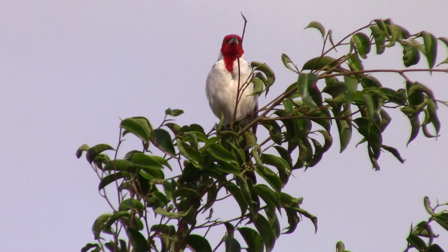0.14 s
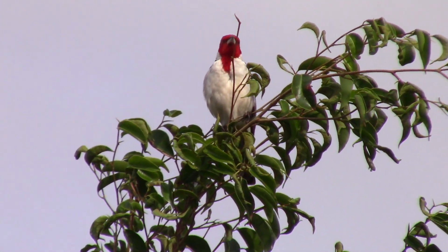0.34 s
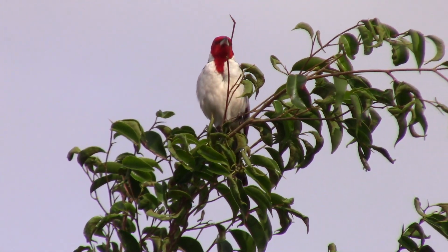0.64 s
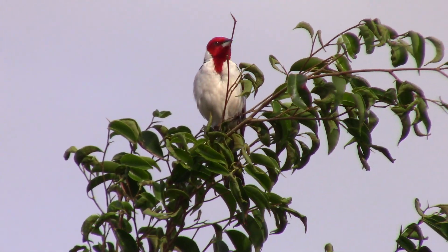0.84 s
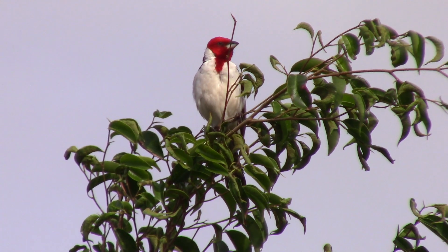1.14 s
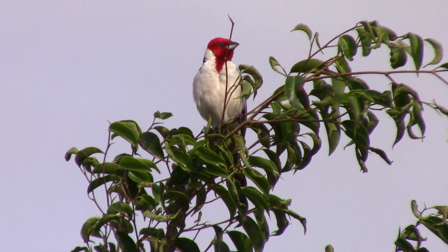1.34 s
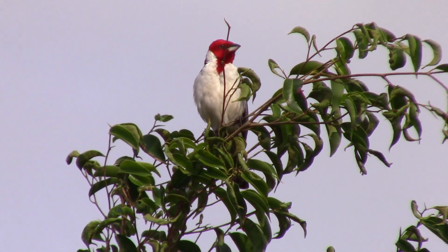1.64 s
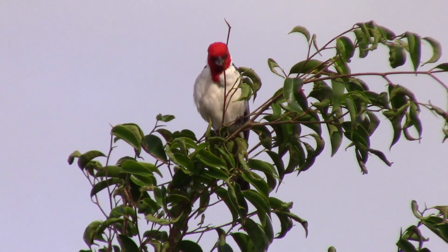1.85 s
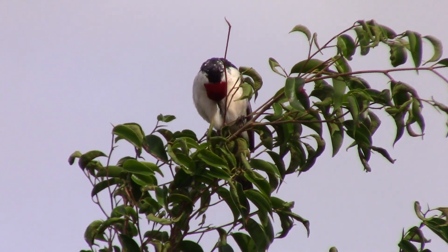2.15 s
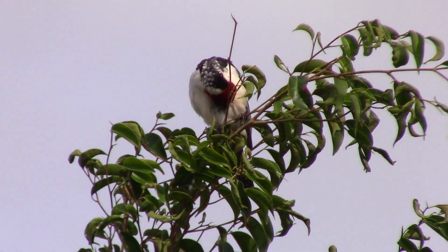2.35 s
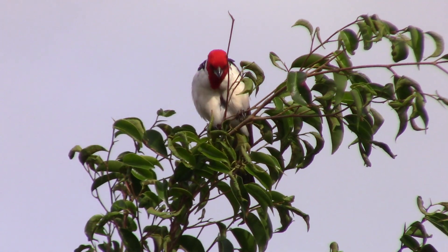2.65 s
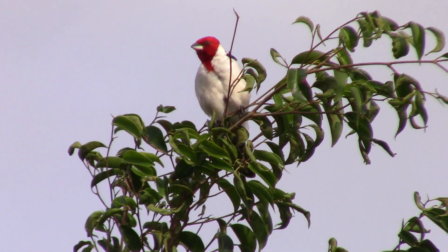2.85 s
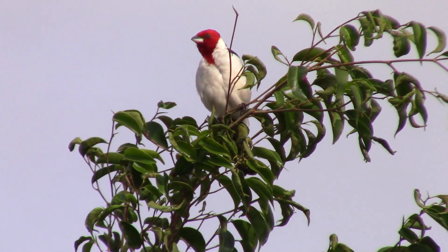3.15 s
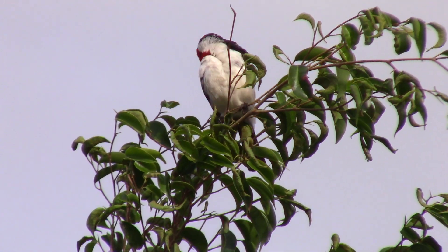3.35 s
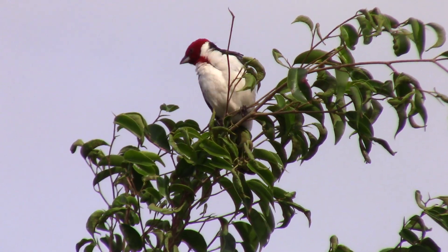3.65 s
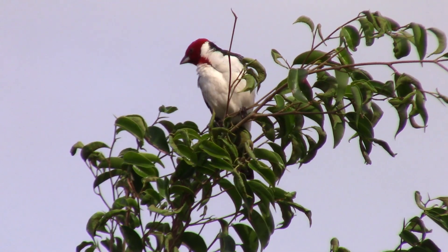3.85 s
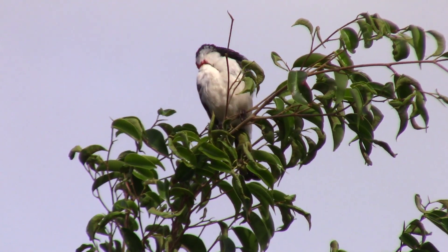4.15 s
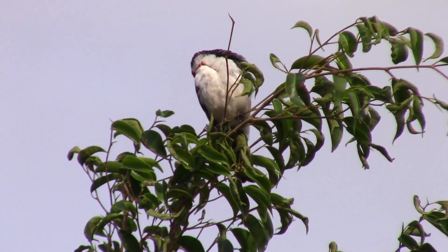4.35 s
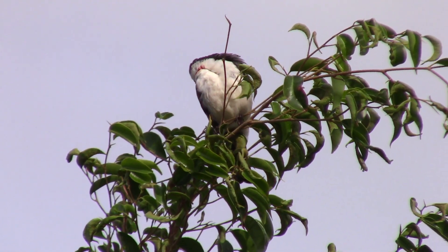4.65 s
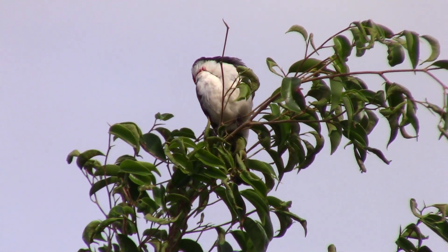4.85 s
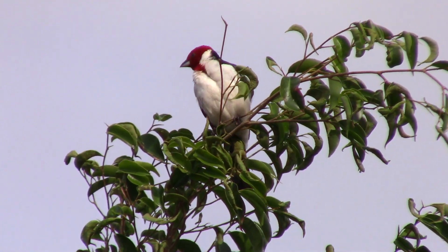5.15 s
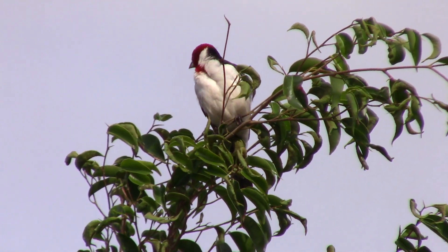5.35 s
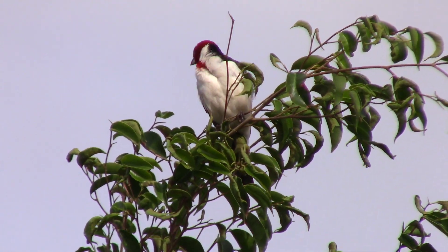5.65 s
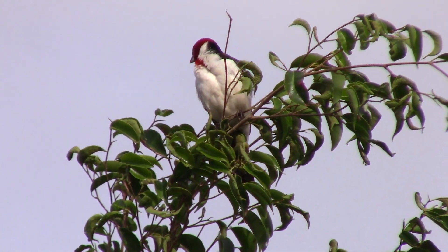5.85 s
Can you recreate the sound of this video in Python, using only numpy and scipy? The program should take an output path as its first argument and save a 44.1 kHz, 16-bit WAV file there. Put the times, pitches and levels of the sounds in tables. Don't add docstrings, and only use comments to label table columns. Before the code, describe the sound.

Outdoors, bright accelerating bird trills alternate near and far over whistled calls and flock chatter, leaf hiss, early wind buffeting and a slowly swelling road rumble.

```python
import sys
import numpy as np
from scipy import signal
from scipy.io import wavfile
from scipy.ndimage import uniform_filter1d

SR = 44100
rng = np.random.default_rng(int(sys.argv[2]) if len(sys.argv) > 2 else 0)


def to_wav(s):
    ch = np.atleast_2d(s).T
    pcm = np.round(np.clip(ch, -1, 1) * 32767)
    wavfile.write(sys.argv[1], SR, pcm.astype(np.int16))


def to_linear_factor(level_db):
    exponent = np.asarray(level_db, float) / 20
    return 10 ** exponent


N = 264820
SIDE = np.array([[.5], [-.5]])


def evened(x):
    return x / np.sqrt(np.mean(x ** 2) + 1e-20)


def add(mix, s, sound):
    part = mix[..., max(round(s * SR), 0):][..., :sound.shape[-1]]
    part += sound[..., :part.shape[-1]]


def follow(rows, smooth=.002):
    s, *columns = np.transpose(rows)
    t = np.arange(s[0], s[-1], 1 / SR)
    size = int(smooth * SR) + 1
    return [uniform_filter1d(np.interp(t, s, c), size, mode="nearest") for c in columns]


def level(rows):
    s, db = np.transpose(rows)
    return np.interp(np.arange(N) / SR, s, db)


def read(points, hz):
    f, db = np.transpose(points)
    return np.interp(np.log(hz + 1), np.log(f), db)


def turns(hz):
    return 2 * np.pi * (np.cumsum(hz) / SR + rng.random())


def faded(x):
    return x * signal.windows.tukey(len(x), .15)


def flutter(length, size):
    once = uniform_filter1d(rng.standard_normal(length), size)
    return evened(uniform_filter1d(once, size))


def tree(x, wet_db, t60, pan_db, echoes=()):
    out = x * to_linear_factor(SIDE * pan_db)
    for delay, db in echoes:
        add(out, delay, to_linear_factor(db) * x)
    t = np.arange(SR // 2) / SR
    taps = rng.standard_normal((2, len(t))) + 1.12 * rng.standard_normal(len(t))
    sparse = rng.random(len(t)) < .05
    tail = taps * sparse * to_linear_factor(-60 * t / t60) * (t > .009)
    tail = signal.lfilter(*signal.butter(2, (2300, 7500), "band", fs=SR), tail)
    tail = tail / np.linalg.norm(tail[0])
    return out + to_linear_factor(wet_db - 4.0) * signal.fftconvolve(x[None], tail, axes=1)[:, :N]


def trill(onsets, throat, peak_db, mid_hz, fade_db, last_db, last_pitch, lead=0., third_db=0., low_fall=1.):
    # (time from onset [s], pitch factor, level [dB])
    note_shape = [(-.0007, 1.07, -22), (.0003, 1.035, 0), (.002, .995, 0), (.0045, .95, 0),
                  (.0065, .88, -1), (.0085, .805, -2), (.0105, .76, -7), (.0125, .74, -25)]
    first_db, sag, scatter = -2.5, 0.037, 0.0088
    bend, shape_db = follow(note_shape, smooth=0.00077)
    out = np.zeros(N)
    for i, s in enumerate(onsets):
        u = i / (len(onsets) - 1)
        db = peak_db + fade_db * u + first_db * (u == 0) + last_db * (u == 1)
        pitch = mid_hz / 2 * (1 - sag * (2 * u - 1) ** 2 + scatter * rng.standard_normal())
        pitch = pitch * (last_pitch if u == 1 else 1) * bend
        partials = (pitch * bend ** (low_fall - 1), 2 * pitch, 3 * pitch)
        note = np.zeros(len(bend))
        for k, hz in enumerate(partials):
            third = k > 1
            waver_db = (1.3 + 1.7 * third) * flutter(len(bend), size=30)
            note += to_linear_factor(read(throat, hz) + third_db * third + waver_db) * np.sin(turns(hz))
        add(out, s + note_shape[0][0] - lead, to_linear_factor(db + shape_db) * note)
    return out


def leading_bird():
    first_onsets = [.1212, .228, .3018, .3693, .4269, .4771, .5233, .5684, .6115, .654, .6975, .7407, .7816,
                    .825, .8674, .9091, .9495]
    repeat_onsets = [3.7294, 3.8217, 3.899, 3.9587, 4.0108, 4.0567, 4.1014, 4.148, 4.1912, 4.235, 4.2787,
                     4.3216, 4.364, 4.409, 4.4528, 4.4965, 4.5404, 4.5845, 4.6286, 4.672]
    # (frequency [Hz], level [dB])
    throat = [(1200, -32), (1400, -20), (1520, -14), (1680, -14), (1850, -21), (2550, -10), (3000, -12.5),
              (3150, -9), (3330, -3), (3500, -.5), (3720, -1), (4050, -22), (4500, -20), (5200, -29)]
    # (delay [s], level [dB])
    first_echo = [(.0085, -13), (.013, -18), (.019, -18), (.023, -19), (.029, -19)]
    repeat_echo = [(.007, -13), (.018, -11.5), (.03, -17)]
    first = trill(first_onsets, throat, peak_db=-35.5, mid_hz=3491, fade_db=-2.5, last_db=-2, last_pitch=.5,
                  third_db=3.5, low_fall=.5)
    repeat = trill(repeat_onsets, throat, peak_db=-35.5, mid_hz=3394, fade_db=0, last_db=-4, last_pitch=.9,
                   third_db=-1, low_fall=.5)
    return tree(first, -10, .2, 0.1, first_echo) + tree(repeat, -10.5, .2, 0.1, repeat_echo)


def answering_bird():
    answer_onsets = [1.2256, 1.412, 1.475, 1.5254, 1.5766, 1.625, 1.6737, 1.719, 1.7656, 1.8153, 1.8609,
                     1.9063, 1.9514, 1.9993, 2.0453, 2.0921, 2.137, 2.1823]
    restart_onsets = [5.7515, 5.8435, 5.9185, 5.977]
    # (frequency [Hz], level [dB])
    throat = [(1100, -24), (1300, -11), (1550, -5), (2400, -10), (2850, 0), (3300, -1), (3700, -22)]
    # (delay [s], level [dB])
    echoes = [(.017, -8), (.024, -12), (.036, -13)]
    song = trill(answer_onsets, throat, peak_db=-47, mid_hz=3098, fade_db=-1, last_db=1, last_pitch=.94,
                 lead=.002)
    song += trill(restart_onsets, throat, peak_db=-48, mid_hz=3045, fade_db=-1, last_db=3, last_pitch=1.0,
                  lead=.002)
    return tree(song, -10.5, .3, -1.5, echoes)


def chirps():
    # (time [s], low side [Hz], high side [Hz], low level [dB], high level [dB])
    calls = [
        [(.993, 3620, 4440, -66, -38), (1.003, 3650, 4800, -47.5, -49), (1.013, 3290, 5150, -45, -49),
         (1.025, 2986, 5300, -42.5, -46.5), (1.045, 2618, 5080, -47.5, -46.5), (1.06, 2710, 4720, -49, -42.5),
         (1.073, 3350, 4740, -47, -55)],
        [(1.305, 3900, 4950, -71, -62), (1.324, 3220, 5100, -57, -60), (1.333, 2750, 5150, -46.5, -74),
         (1.347, 2440, 5150, -54.5, -56), (1.368, 2480, 5250, -57, -65)],
    ]
    # (multiple of low, multiple of high, level [dB])
    mixed = [(1, 0, 2), (0, 1, -2), (2, 0, -0.5), (1, 1, -7), (3, 0, -15), (0, 2, -19), (2, 1, -18),
             (4, 0, -22), (1, 2, -32), (3, 1, -32), (2, 2, -36), (0, 3, -38), (5, 0, -36)]
    # (frequency [Hz], level [dB])
    throat = [(2500, -2.5), (5300, 3), (7200, -7), (8400, -5.5), (10300, 0.5), (12500, -7), (14500, -5)]
    out = np.zeros(N)
    for rows, sums_db in zip(calls, (0.1, -24)):
        low, high, low_db, high_db = follow(rows, smooth=0.0031)
        a, b = (turns(hz * (1 + .006 * flutter(len(hz), size=60))) for hz in (low, high))
        t = np.arange(len(low)) / SR
        for m, n, db in mixed:
            db = db + (m * low_db + n * high_db) / (m + n) + sums_db * (m + n > 1)
            db = db + read(throat, m * low + n * high)
            db = db + 2.5 * np.sqrt(m + n) * flutter(len(low), size=70)
            db = db - 11 * max(m - 1, 0) * np.exp(-(t / .018) ** 2)
            add(out, rows[0][0], faded(to_linear_factor(db + 1.5) * np.sin(m * a + n * b)))
    return out


def chips():
    # (time [s], peak level [dB], lowest tone [Hz])
    notes = [
        (2.2144, -48.5, 1620),
        (2.2773, -48.5, 1664),
        (2.345, -49.5, 1590),
    ]
    partial_db = [-4.5, -7.5, -0.5, -11, -16.5]
    out = np.zeros(N)
    t = np.arange(int(0.017 * SR)) / SR
    shape = np.minimum(t / 0.0027, 1) * np.cos(np.pi / 2 * t / t[-1]) ** 2
    for s, db, hz in notes:
        phase = turns(hz * (.975 + 3 * t))
        buzz = np.zeros(len(t))
        for k, p in enumerate(partial_db):
            buzz += to_linear_factor(p + 2.3 * flutter(len(t), size=40)) * np.sin((k + 1) * phase)
        add(out, s, to_linear_factor(db) * shape * buzz)
    return out


def whistle(rows, waver_db=1.3):
    hz, db = follow(rows, smooth=.004)
    return faded(to_linear_factor(db + 2.0 + waver_db * flutter(len(hz), size=100)) * np.sin(turns(hz)))


def hooks():
    # (time [s], level [dB], level of the last fall [dB], level of the second hook [dB])
    pairs = [
        (.046, -53.5, -5, -63),
        (1.738, -58, -12, -75),
        (3.026, -50.5, 5, -59),
        (3.956, -54.5, -12, -59),
        (4.698, -50, 0, -54),
        (5.608, -52, -5, -55),
        (5.955, -67, -12, -80),
    ]
    # (time from the top [s], frequency [Hz], level [dB])
    main = [(-.046, 4550, -12), (-.034, 3900, -5), (-.026, 3700, -4), (-.013, 4100, 0), (-.005, 4350, -1),
            (-.001, 5020, -4), (.005, 4200, -7), (.011, 3000, -6), (.02, 2400, -16)]
    trailing = [(.008, 3230, -12), (.018, 3330, -9), (0.029, 3650, -12)]
    rising = [(0, 3730, -8), (.01, 4020, -19), (0.025, 4550, -16)]
    out = np.zeros(N)
    for s, db, fall_db, again_db in pairs:
        for at, top_db, hook in ((s, db, main), (s + .089, again_db, main[2:])):
            for shape in (hook, trailing, rising):
                rows = [(t, hz, top_db + d + fall_db * (t > 0)) for t, hz, d in shape]
                add(out, at + shape[0][0], whistle(rows))
    return out


def arches():
    # (time from the top [s], frequency [Hz], level [dB])
    step = [(-.087, 2150, -13), (-.075, 2700, -8), (-.042, 3000, -3), (-.032, 3400, -6), (-.022, 4300, 0),
            (-.01, 4700, -2), (.008, 4850, -6), (.024, 4400, 2), (.046, 3280, -6)]
    step_over = [(-.06, 3346, -3), (-.045, 3800, -6), (-.032, 4050, -3), (-.012, 4610, -5),
                 (.04, 4800, -2.5), (.058, 4500, -9), (.078, 3890, 2)]
    tent = [(-.077, 2650, -12), (-.053, 2700, -9), (-.03, 4150, 0), (-.017, 4400, -1)]
    tent_top = [(-.019, 4600, -5), (-.012, 4900, -8), (0, 5300, -12), (.014, 4900, -12)]
    tent_fall = [(.012, 4800, -3), (.025, 4250, -2), (.031, 3750, -3), (.041, 3480, -1), (.056, 2550, -17)]
    out = np.zeros(N)
    # shape, time of the top [s], level [dB], level of the second [dB]
    for shape, s, db, again_db in ((step, 2.59, -47, -53), (step_over, 2.59, -47, -69),
                                   (tent, 3.525, -46.5, -52), (tent_top, 3.525, -51.5, -64),
                                   (tent_fall, 3.525, -45, -53)):
        for at, top_db in ((s, db), (s + .143, again_db)):
            add(out, at + shape[0][0], to_linear_factor(top_db) * whistle(shape, waver_db=2.6))
    return out


def slides():
    # (start [s], end [s], from [Hz], to [Hz], level [dB])
    plain = [(3.715, 3.762, 5030, 5170, -60), (3.715, 3.755, 4380, 4250, -59),
             (3.135, 3.182, 4030, 3950, -60), (3.058, 3.085, 2480, 2350, -61),
             (5.098, 5.16, 4300, 4100, -63), (5.3, 5.385, 4370, 4350, -62), (3.51, 3.535, 4150, 4300, -59),
             (3.562, 3.59, 4450, 4620, -58), (3.64, 3.68, 3450, 3500, -61), (3.185, 3.21, 3550, 3450, -64),
             (3.225, 3.255, 3950, 3900, -66), (2.96, 2.98, 2450, 2400, -65),
             (3.258, 3.275, 3300, 3500, -64), (3.98, 4.01, 2300, 2350, -63),
             (5.455, 5.472, 3500, 4400, -68), (5.472, 5.485, 4400, 3300, -68),
             (5.32, 5.35, 2700, 2800, -68), (5.875, 5.895, 4700, 4700, -68), (5.928, 5.95, 3000, 4000, -65),
             (3.785, 3.81, 5800, 6050, -67), (3.885, 3.93, 4250, 4200, -60),
             (3.588, 3.602, 4550, 3400, -61), (3.6, 3.625, 3350, 3450, -62),
             (2.542, 2.562, 4600, 4650, -59), (2.596, 2.608, 4050, 4150, -55),
             (5.385, 5.44, 4350, 4330, -67), (1.378, 1.403, 5000, 5250, -64), (5.15, 5.3, 3450, 3400, -70),
             (5.578, 5.587, 3600, 2900, -62), (2.675, 2.69, 4650, 4500, -61)]
    farthest = [(4.275, 4.335, 5310, 5220, -66), (4.275, 4.335, 4500, 4700, -65),
                (4.23, 4.27, 6630, 7000, -71), (2.51, 2.56, 4800, 7500, -69), (2.56, 2.6, 8700, 9700, -75),
                (5.09, 5.108, 6100, 5050, -66), (5.124, 5.14, 6850, 5200, -69),
                (5.114, 5.124, 5700, 6850, -69), (5.105, 5.15, 5100, 5400, -68),
                (4.37, 4.39, 6600, 7600, -72)]
    ends_db = -3.5
    out = np.zeros(N)
    for rows, waver_db in ((plain, 3.2), (farthest, 4.5)):
        for start, end, from_hz, to_hz, db in rows:
            middle = ((start + end) / 2, (from_hz + to_hz) / 2, 0)
            swell = [(start, from_hz, ends_db), middle, (end, to_hz, ends_db)]
            add(out, start, to_linear_factor(db) * whistle(swell, waver_db))
    return out


def chatter():
    # (start [s], end [s], level [dB], centre [Hz])
    bursts = [(.03, .11, -59.5, 4180), (.23, .27, -63, 4500), (.3, .345, -63, 4400), (.368, .4, -58, 4065),
              (.5, .9, -66, 4500), (.904, 1.006, -57, 4260), (1.065, 1.253, -65.5, 4330),
              (1.502, 2.171, -64.5, 3154), (1.68, 1.799, -63.5, 4300), (2.052, 2.17, -67, 4350),
              (2.187, 2.277, -61.5, 2300), (2.359, 2.503, -61.5, 3980), (2.52, 2.602, -72, 5900),
              (2.56, 2.8, -64, 4170), (2.6, 2.66, -78, 9300), (2.949, 3.117, -63, 4200),
              (3.117, 3.299, -66, 3630), (3.12, 3.22, -69, 4900), (3.399, 3.462, -65, 3990),
              (3.518, 3.68, -62, 3700), (3.705, 3.831, -59, 4260), (3.867, 4.046, -59, 4335),
              (4.27, 4.339, -61.5, 4700), (4.349, 4.52, -59.5, 4130), (4.318, 4.4, -72, 6300),
              (4.624, 4.75, -60.5, 4200), (4.75, 4.83, -65, 3900), (5.13, 5.22, -69, 5550),
              (5.104, 5.199, -68, 3960), (5.32, 5.445, -63, 3970), (5.54, 5.57, -62, 4500),
              (5.57, 5.721, -61.5, 4050), (5.608, 5.626, -56, 3320), (5.86, 5.93, -69, 4600)]
    peeps_per_s = 900
    out = np.zeros(N)
    for start, end, db, hz in bursts:
        burst = np.zeros(int((end - start) * SR))
        count = int(peeps_per_s * (end - start)) + 1
        for place, pitch, glide, length, size in rng.random((count, 5)):
            t = np.arange(int(SR * (0.0035 + 0.0092 * length))) / SR
            offset = 1.1 * (pitch - .5) * (.1 + (pitch - .5) ** 2)
            bend = 1 + offset + 0.17 * (glide - .5) * t / t[-1]
            peep = size * np.hanning(len(t)) * np.sin(turns(hz * bend))
            add(burst, place * (end - start), peep)
        add(out, start, to_linear_factor(db) * evened(burst) * signal.windows.tukey(len(burst), .4))
    return out


def ticks():
    # (time [s], peak level [dB], frequency [Hz])
    snaps = [
        (1.1, -43, 2500),
        (5.156, -42, 1900),
        (5.423, -47, 2900),
        (1.7, -46, 4700),
    ]
    out = np.zeros(N)
    t = np.arange(int(.003 * SR)) / SR
    for s, db, hz in snaps:
        add(out, s, to_linear_factor(db) * np.exp(-t / 0.00054) * np.sin(2 * np.pi * hz * t))
    return out


def noise(points, same, patchy_db, size=1024):
    frames, hz = 4 * N // size + 5, np.fft.rfftfreq(size, 1 / SR)
    a, b, c, d, patches = rng.standard_normal((frames, len(hz), 5)).T
    patches = uniform_filter1d(patches, size=8, axis=0)
    patches = evened(uniform_filter1d(patches, size=10, axis=1))
    shape_db = read(points, hz)[:, None] + patchy_db * patches
    shared = a + 1j * b
    apart = to_linear_factor(read(same, hz))[:, None] * (c + 1j * d)
    z = np.array([shared + apart, shared - apart]) * to_linear_factor(shape_db)
    return evened(signal.istft(z, nperseg=size, noverlap=size - size // 4)[1][:, :N])


def gusting():
    # (time [s], level [dB])
    breeze = [(0, -45), (.45, -37), (.68, -38), (.78, -55), (1.1, -45), (1.4, -52.5), (2.4, -48.5),
              (3.0, -51.5), (3.6, -51), (4, -63), (4.8, -70), (4.9, -46.5), (5.3, -58), (6, -54)]
    # (time [s], level [dB], left-right difference [dB], half length [s])
    gusts = [(0.008, -28, -6, 0.046), (0.132, -32.5, 10, 0.028), (0.165, -32.5, -11, 0.025),
             (.26, -39, -7, 0.019), (0.348, -29.5, -3, 0.041), (0.654, -32, 0, 0.027),
             (1.139, -36.5, 0, 0.034), (2.065, -46, -5, 0.028), (2.333, -38.5, 2, 0.041),
             (5.23, -47, 4, .03), (5.815, -52, -8, 0.038), (5.93, -48.5, -4, 0.029)]
    t = np.arange(N) / SR
    bells = np.zeros((2, N))
    for s, db, pan_db, half in gusts:
        bells += to_linear_factor(db + SIDE * pan_db) * np.exp(-((t - s) / half) ** 2)
    return np.hypot(to_linear_factor(level(breeze)), bells)


def buffets():
    # (time [s], peak level [dB], frequency [Hz], left-right difference [dB], length [s])
    thumps = [(0.011, -24.5, 189, 3.5, 0.01), (0.049, -25, 145, -1, 0.0044), (0.131, -26.5, 196, 9, 0.0076),
              (0.152, -19, 135, -7, 0.013), (0.244, -23.5, 135, -4, 0.0075), (0.332, -17, 163, 1, 0.0072),
              (0.349, -21, 158.5, -2, 0.0091), (0.498, -27, 110, 6, 0.01), (0.643, -22.5, 140, -2, 0.0081),
              (0.664, -28, 123.5, 6, 0.01), (1.103, -30, 144, 1, 0.0065), (1.129, -30.5, 141, 3, 0.0087),
              (2.057, -30, 142, 5, 0.0053), (2.33, -40, 117.5, 11, 0.017), (5.804, -31, 106, -2.0, 0.0094),
              (5.939, -41.5, 156, 5, 0.015), (0.03, -30, 232, -3, 0.0066), (0.202, -35, 110, -6, .008),
              (.293, -32.5, 199, -7, 0.0067), (.378, -27, 171, 0, 0.0091), (.402, -27, 122, 2, .007),
              (0.435, -33, 240, 4, 0.0092), (.682, -30, 118, 0, 0.0084), (0.163, -39, 473, -7, 0.0023)]
    out = np.zeros((2, N))
    for s, db, hz, pan_db, length in thumps:
        t = np.arange(int(4 * length * SR)) / SR
        push = t / length * np.exp(1 - t / length) * np.exp(-(t / length / 1.82) ** 2)
        start = rng.random() + 0.12 * rng.standard_normal((2, 1))
        phase = 2 * np.pi * (hz * t * (1.2 - 5 * t) + start)
        ring = np.sin(phase) + 0.21 * np.sin(2 * phase + 1.95)
        add(out, s, to_linear_factor(db + SIDE * pan_db) * push * ring)
    return out


def wind():
    # (frequency [Hz], level per Hz [dB])
    blow = [(12, -68), (20, -29.5), (91, -1.5), (140, 0), (252, -10), (335, -17), (433, -24), (634, -31.5),
            (720, -52), (900, -54), (1170, -78), (1980, -120)]
    # (frequency [Hz], side minus mid [dB])
    apart = [(40, -11), (120, -11), (300, -6)]
    air = noise(blow, apart, 2.6, size=2048) * to_linear_factor(2.7 * flutter(N, size=500))
    steady = air / np.sqrt(uniform_filter1d((air ** 2).mean(0), size=3000) + 0.079)
    return steady * to_linear_factor(-1.0) * gusting() + buffets()


def traffic():
    # (frequency [Hz], level per Hz [dB])
    rumble = [(59, -30), (100, -3.5), (237, 0), (282, -9), (428, -4.5), (608, -8), (829, -7.5), (980, -11),
              (1120, -17), (1460, -26), (2500, -28), (3250, -58), (5500, -120)]
    # (frequency [Hz], side minus mid [dB])
    apart = [(200, -23), (450, -16), (700, -16)]
    # (time [s], level [dB])
    swell = [(0, -59.5), (.35, -61), (.53, -64), (.7, -60), (1.2, -57), (2.9, -55), (3.4, -55),
             (4.6, -49.5), (6, -47)]
    return noise(rumble, apart, 1.0) * to_linear_factor(level(swell) + 2.5)


def drone():
    # (start [s], end [s], frequency [Hz], level [dB])
    engines = [
        (3.5, 4.25, 146.7, -53),
    ]
    out = np.zeros(N)
    for start, end, hz, db in engines:
        n = int((end - start) * SR)
        pitch = hz * (1 + 0.016 * flutter(n, size=3000))
        tone = to_linear_factor(db + 2.5 * flutter(n, size=2500)) * np.sin(turns(pitch))
        add(out, start, tone * signal.windows.tukey(n, .4))
    return out


def leaves():
    # (frequency [Hz], level per Hz [dB])
    hiss = [(530, -38), (900, -12.5), (1270, -14), (1930, -15), (2480, -16.5), (2660, -14.5), (3800, -17.5),
            (4550, -20), (6350, -25.5), (15500, -40)]
    # (frequency [Hz], side minus mid [dB])
    apart = [(1500, -9.5), (12000, -12.5)]
    return noise(hiss, apart, 1.0) * to_linear_factor(-59.5)


def scene():
    mix = leading_bird() + answering_bird()
    mix += tree(chirps(), -7.5, 0.16, -1.1, [(.011, -14)])
    mix += tree(chips() + ticks(), -10, .1, -1.04, [(.01, -9)])
    mix += tree(hooks() + arches() + slides(), -7, .2, -1.4, [(.011, -18)])
    mix += tree(chatter(), -3.0, 0.25, -1.1)
    return mix + wind() + traffic() + drone() + leaves()


def roll_off(x):
    return signal.sosfilt(signal.butter(12, 15660, fs=SR, output="sos"), x)


def record(dry):
    # (start [s], end [s])
    starved = [(.215, .24), (.29, .31), (.43, .5), (.53, .63), (.68, .928), (4.06, 4.1), (4.135, 4.28),
               (4.31, 4.36), (4.45, 4.635)]
    dip_s, dip_db, dip_width_s = 0.46, -3.5, 0.11
    t = np.arange(N) / SR
    dry = signal.sosfilt(signal.butter(2, 52, "high", fs=SR, output="sos"), dry)
    dry = dry * to_linear_factor(dip_db * np.exp(-((t - dip_s) / dip_width_s) ** 2))
    top = signal.sosfiltfilt(signal.butter(12, 12900, "high", fs=SR, output="sos"), dry)
    busy = sum((t > start) & (t < end) for start, end in starved)
    finished = dry - top * uniform_filter1d(busy * 1., size=300)
    return roll_off(finished)


dry = scene()
out = record(dry)
to_wav(out)
```